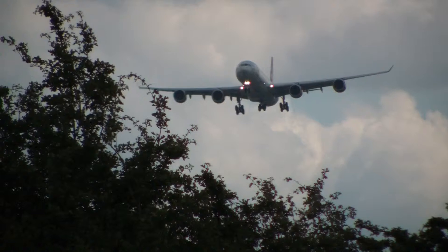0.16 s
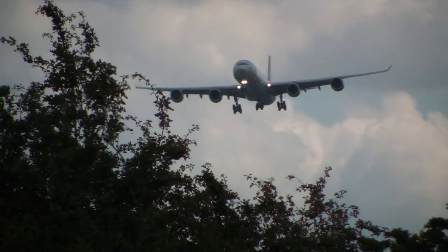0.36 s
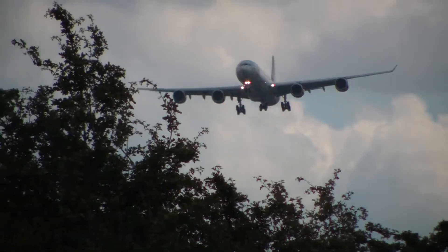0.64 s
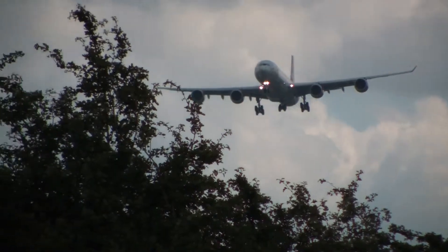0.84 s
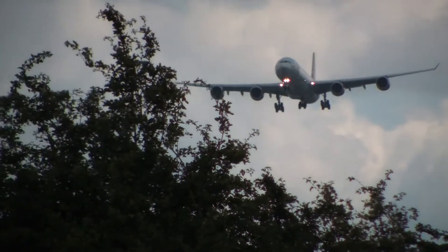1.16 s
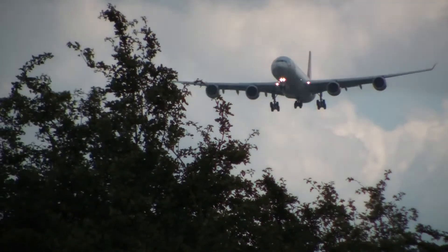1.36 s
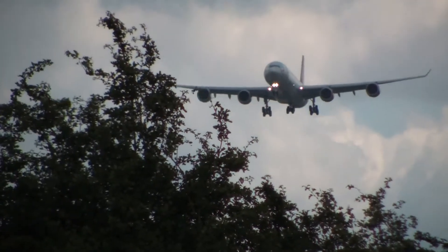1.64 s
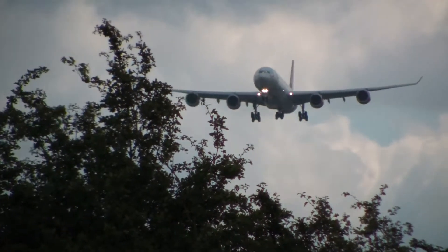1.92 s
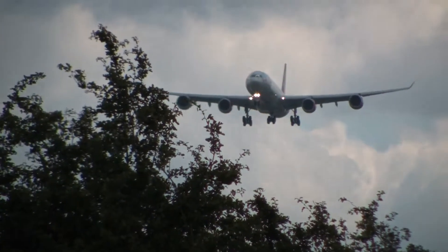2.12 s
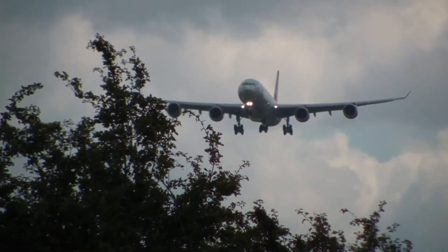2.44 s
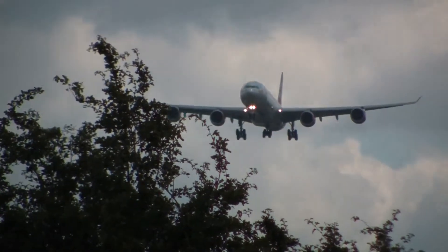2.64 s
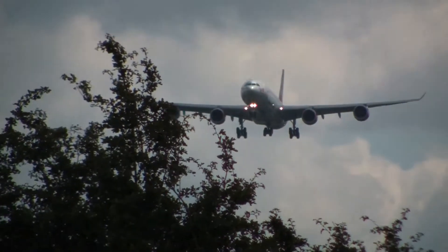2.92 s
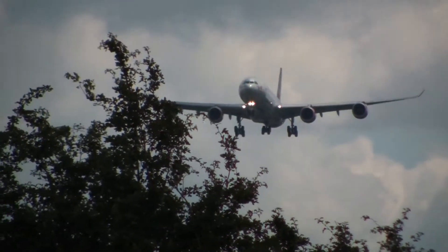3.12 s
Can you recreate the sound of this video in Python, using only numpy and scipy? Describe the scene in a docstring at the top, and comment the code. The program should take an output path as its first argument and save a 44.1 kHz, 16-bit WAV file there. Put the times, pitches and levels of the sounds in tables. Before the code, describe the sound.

A distant four-engine airliner approaches with a broad, uneven roar, deep rumble and faint blurred moan, slowly growing; outdoors in the open, short wind gusts thump and buffet the unprotected stereo microphone, sometimes overloading it.

```python
"""Airliner approach in a breeze

Far off, an airliner on its landing approach gives a low rumble, a deep throb, a blurred moan and a broad roar.
All four are shaped noise; each band of the roar swells and fades, in part dipping after hard gusts as the
recorder's limiter turns the level down. Wind noise with short gusts and single pressure thumps buffets
the microphone, the hardest up to overload."""
import sys
import numpy as np
from scipy import signal
from scipy.fft import rfft, irfft
from scipy.io import wavfile
from scipy.ndimage import uniform_filter1d

SR = 44100
rng = np.random.default_rng(int(sys.argv[2]) if len(sys.argv) > 2 else 0)


def transcribe(signal):
    """Save signal, clipped to [-1, 1], as a 16-bit WAV file at the path in sys.argv[1]."""
    frames = np.atleast_2d(signal).T
    limited = np.clip(frames, -1, 1)
    pcm = np.round(limited * 32767).astype(np.int16)
    wavfile.write(sys.argv[1], SR, pcm)


N = 144648

# Uneven rise and fall of the rumble, without its steady growth; only relative level counts [t/s, level/dB]
RUMBLE_SWELL = [(0.19, -24), (0.47, -25.5), (0.75, -21), (0.79, -26.5), (0.91, -19.5), (0.99, -25.5),
                (1.19, -25), (1.27, -21), (1.51, -26), (1.71, -24.5), (1.79, -26.5), (2.79, -18.5),
                (2.91, -24.5), (3.11, -22), (3.23, -25)]
# Rise and fall of the roar, shared by the fan moan; only the relative level counts [t/s, level/dB]
ROAR_SWELL = [(0.19,-23.5), (0.27,-19.5), (0.44,-25), (0.5,-20), (0.56,-16), (0.7,-19), (0.8,-20.5),
              (1.15,-22.5), (1.23,-26.5), (1.31,-22.5), (1.55,-25), (1.63,-21.5), (1.75,-26.5), (1.83,-22),
              (1.91,-25), (1.97,-19.5), (2.15,-20.5), (2.2,-24.5), (2.42,-22), (2.49,-22), (2.63,-19),
              (2.76,-21), (2.83,-26), (3.07,-22), (3.23,-25.5)]
TONAL_SAME, TONAL_LEFT_DB = 1, 2.5  # rumble, throb and moan: left-right likeness, left minus right


def amp(db):
    """Decibels to gain."""
    return 10 ** (np.asarray(db) / 20)


def unit(x):
    """Scales to rms 1."""
    return x / np.sqrt(np.mean(x ** 2) + 1e-20)


def at_hz(points, hz):
    """Reads a table on a log-frequency axis."""
    f, value = np.transpose(points)
    return np.interp(np.log(hz + 1), np.log(f + 1), value)


def swing(points, t):
    """Reads a level curve, in dB about its mean power."""
    db = np.interp(t, *np.transpose(points))
    return db - 10 * np.log10(np.mean(amp(db) ** 2))


def drift(shape, widths):
    """Smooth random field of rms 1; widths in cells, one for each axis."""
    field = rng.standard_normal(shape)
    for axis, width in enumerate(widths):
        smooth = np.exp(-(np.fft.rfftfreq(shape[axis]) * width * 2) ** 2)
        spectrum = rfft(field.swapaxes(axis, -1)) * smooth
        field = irfft(spectrum, shape[axis]).swapaxes(axis, -1)
    return unit(field)


def noise_pair(gain, same):
    """Left and right noise with one spectrum; the likeness is the share of power in common."""
    common, own_left, own_right = rfft(rng.standard_normal((3, N))) * gain
    same = np.clip(same, 0, 1)
    own = np.array([own_left, own_right])
    return unit(irfft(np.sqrt(same) * common + np.sqrt(1 - same) * own, N))


def steadied(x, span_s):
    """Divides out the slow level of a noise, so that an envelope alone sets its strength."""
    power = uniform_filter1d((x ** 2).mean(0), max(int(span_s * SR), 2))
    return x / np.sqrt(power + 1e-9)


def narrow_noise(centre_hz, width_hz, span_s):
    """Steadied noise in a resonance-shaped hump; the width is taken at half amplitude."""
    hz = np.fft.rfftfreq(N, 1 / SR)
    gain = 1 / (1 + (2 * (hz - centre_hz) / width_hz) ** 2)
    return steadied(noise_pair(gain, TONAL_SAME), span_s)


def panned(x, left_db):
    """Sets the left channel this many dB above the right."""
    return x * amp(np.array([[left_db], [-left_db]]) / 2)


def jet_roar():
    """Exhaust and airframe noise; each band swells and fades, in part dipping as the limiter reacts to gusts."""
    # Average colour of the jet noise; only its shape counts [f/Hz, level per Hz/dB]
    colour = [(100, -6), (185, -1), (250, 0), (310, -2), (450, -9), (600, -5.5), (780, -3), (920, -2.5),
              (1200, -6), (1600, -9.5), (2000, -13.5), (2700, -21), (3700, -25), (5000, -30.5), (6600, -34),
              (8000, -42.5), (10000, -49.5), (13500, -53.5)]
    # Rise and fall of the low middle, upper roar, hiss and treble; relative levels [t/s, level/dB]
    body_swell = [(0.19, -27.0), (0.27, -22), (0.35, -33), (0.55, -26.5), (0.99, -29.5), (1.11, -31.5),
                  (1.19, -27), (1.27, -31.0), (1.43, -28.5), (1.55, -29.5), (1.71, -26.5), (2.07, -29.5),
                  (2.11, -28), (2.31, -32), (2.51, -22), (2.55, -29), (2.67, -26.5), (2.91, -29),
                  (2.99, -25), (3.23, -27)]
    upper_swell = [(0.19,-26), (0.33,-25), (0.4,-28.5), (0.51,-24.5), (0.63,-27.5), (0.8,-27), (0.9,-25.5),
                   (1.35,-24), (1.7,-24), (1.8,-28), (1.9,-29), (2.05,-25.5), (2.43,-26), (2.68,-23.5),
                   (2.83,-26), (3.05,-27), (3.23,-31)]
    hiss_swell = [(0.19, -39), (0.27, -37.5), (0.43, -43.5), (0.55, -39.5), (0.71, -40), (0.79, -41),
                  (1.15, -39.5), (1.23, -43), (1.67, -37), (1.83, -38), (1.87, -41), (2.03, -36),
                  (2.43, -39.5), (2.63, -38), (2.79, -39.5), (2.83, -43), (2.91, -41.5), (3.23, -44)]
    treble_swell = [(0.19, -45.5), (0.31, -42.5), (0.43, -50.5), (0.51, -48.0), (0.79, -49.5), (0.95, -49),
                    (1.07, -51.5), (1.19, -47.5), (1.27, -54.5), (1.31, -50.5), (1.47, -51.5), (1.63, -50),
                    (1.91, -49.5), (2.03, -42), (2.43, -47.5), (2.99, -52.5), (3.03, -50.5), (3.23, -53)]
    # Where the six swells act in turn, then a top band with no swell [f/Hz]
    band_hz = [250, 480, 900, 1700, 3400, 6800, 13000]
    # Stereo likeness: the likeness of left and right amplitudes [f/Hz, likeness/1]
    likeness = [(60, 0.95), (300, 1), (900, 0.98), (1800, 0.89), (3700, 0.73), (5000, 0.66), (6600, 0.44),
                (8000, 0.25), (13000, .15)]
    # Stereo balance [f/Hz, left minus right/dB]
    balance = [(100, 0.8), (900, 1.74), (1800, 2), (3700, 2.5), (6600, 1), (9000, 3.5), (13000, 3.5)]
    # Phase by which the left port leads [f/Hz, lead/rad]
    lead = [(100, 0.12), (900, -0.19), (2700, 0.25), (5000, 0.49), (6600, 1.3), (8000, 3.16),
            (10000, -1.75)]
    roar_db = -17
    # scintillation by the air: patches in time and frequency, and a flutter of all bands at once
    patch_db, patch_s, patch_hz = 1.54, 0.16, 122
    flutter_db, flutter_s = 0.5, 0.027

    window, hop = 1024, 256
    frames, hz = N // hop + 5, np.fft.rfftfreq(window, 1 / SR)
    t = np.arange(frames) * hop / SR
    curves = (RUMBLE_SWELL, body_swell, ROAR_SWELL, upper_swell, hiss_swell, treble_swell)
    levels = np.array([swing(curve, t) for curve in curves] + [np.zeros(frames)])
    # each row of shares crossfades one swell into its neighbours along the spectrum
    shares = np.array([at_hz(list(zip(band_hz, row)), hz) for row in np.eye(len(band_hz))])
    db = at_hz(colour, hz) + levels.T @ shares
    db += patch_db * drift(db.shape, (patch_s / t[1], patch_hz / hz[1]))
    db += flutter_db * drift((frames,), (flutter_s / t[1],))[:, None]

    a, b, c, d = rng.standard_normal((4, frames, len(hz)))
    same = np.clip(at_hz(likeness, hz), -1, 1)
    side = amp(at_hz(balance, hz) / 2)
    left = a + 1j * b
    right = same * left + np.sqrt(1 - same ** 2) * (c + 1j * d)
    right = right * np.exp(-1j * at_hz(lead, hz))
    spectra = np.array([left * side, right / side]) * amp(db)
    roar = signal.istft(spectra.swapaxes(1, 2), nperseg=window, noverlap=window - hop)[1]
    return amp(roar_db) * unit(roar[:, :N])


def jet_rumble():
    """Deep humps of exhaust noise that grow, and sink in pitch, as the aircraft climbs in the view."""
    # Humps in the rumble, before swell and growth [start f/Hz, end f/Hz, width/Hz, level/dB]
    humps = [(137.7, 134, 23, -28), (318, 238, 58, -31), (539.6, 405, 38, -38)]
    growth_db_per_s = 2.4
    t, out = np.arange(N) / SR, np.zeros((2, N))
    for start_hz, end_hz, width_hz, db in humps:
        hump = narrow_noise(start_hz, width_hz, 0.12)
        shift_hz = np.linspace(0, end_hz - start_hz, N)
        glide = np.exp(2j * np.pi * np.cumsum(shift_hz) / SR)
        out += amp(db) * (signal.hilbert(hump) * glide).real  # slides the whole hump in frequency
    growth_db = growth_db_per_s * (t - t.mean())
    return panned(out * amp(swing(RUMBLE_SWELL, t) + growth_db), TONAL_LEFT_DB)


def throb():
    """A narrow, very deep noise band, nearly a pure note, that stands out near the end."""
    # Level of the throb [t/s, level/dB]
    throb_level = [(.2, -29), (2.55, -28), (2.78, -21.5), (2.88, -14), (3.0, -18), (3.12, -24), (3.25, -30)]
    note = narrow_noise(63.8, 18, 0.064)
    t = np.arange(N) / SR
    return panned(note * amp(np.interp(t, *np.transpose(throb_level))), TONAL_LEFT_DB)


def fan_moan():
    """A blurred band of fan noise that swells with the roar and grows as the engines near."""
    moan_db, growth_db_per_s = -33.5, 2.5
    tone = narrow_noise(943, 170, 0.12)
    t = np.arange(N) / SR
    level_db = moan_db + swing(ROAR_SWELL, t) + growth_db_per_s * (t - t.mean())
    return panned(tone * amp(level_db), TONAL_LEFT_DB)


def wind():
    """Eddies press on the two ports, a steady breeze and short gusts; small eddies are less alike at both."""
    # Gusts on the microphone, as bell curves of power [t/s, half length/s, level/dB]
    gusts = [(0.238, 0.015, -21), (0.327, 0.035, -8), (0.376, 0.03, -7), (0.748, 0.045, -7.5),
             (1.038, 0.051, -10), (1.213, 0.04, -7.5), (1.47, 0.088, -13.5), (1.725, 0.039, -9.5),
             (1.82, 0.038, -10), (2.824, 0.023, -8), (3.152, 0.12, -16), (3.263, 0.03, -2)]
    # Colour of the wind pressure on the ports; only its shape counts [f/Hz, level per Hz/dB]
    pressure = [(6, -13), (13, 5), (22, 1), (35, -2), (50, -5), (70, -5.5), (100, -15), (200, -21),
                (400, -35), (1200, -54), (4000, -103)]
    # Stereo likeness of the wind: the share of power in common [f/Hz, likeness/1]
    likeness = [(20, 0.76), (50, 0.63), (110, 0.49), (250, 0.3)]
    breeze_db, left_db = -18, 0.5
    hz, t = np.fft.rfftfreq(N, 1 / SR), np.arange(N) / SR
    power = amp(breeze_db) ** 2
    for centre_s, half_s, db in gusts:
        power = power + amp(db) ** 2 * np.exp(-((t - centre_s) / half_s) ** 2)
    eddies = steadied(noise_pair(amp(at_hz(pressure, hz)), at_hz(likeness, hz)), 0.05)
    return panned(np.sqrt(power) * eddies, left_db)


def thumps():
    """Each eddy gives a brief push or suction with a slower rebound, and reaches the two ports slightly apart."""
    # Single eddies on the microphone [t/s, half width/ms, peak level/dB, left minus right/dB]
    hits = [(.245, 2, -5.5, -4), (.288, 4.7, -7, 5), (0.361, 2.7, -3, 2), (.394, 2.4, 2, 1),
            (0.417, 3.4, -10.5, 22), (.724, 4.1, -2.5, 0), (0.75, 3.2, -0.5, -10), (.962, 2.7, -3, 11.5),
            (1.018, 2.1, -6, 3), (1.094, 5, -11.5, 17), (1.186, 1.64, -3.5, 5), (1.2, 3.2, -0.5, 3.5),
            (1.369, 3, -5.5, 7), (1.501, 1.6, -9, 2), (1.756, 2.4, -4.5, 4), (1.851, 6.6, -4.5, -6),
            (2.196, 3.6, -8, 5), (2.677, 4.7, -7, 2), (2.797, 2.1, -2, 3.5), (3.117, 4.3, -2.5, 1),
            (3.153, 3.4, -7, -2), (3.236, 2.5, -4, -5), (3.258, 4.8, 2.5, 5)]
    rebound = 3  # times wider than the push
    port_lag_ms = 1.34  # largest shift of arrival, opposite at the two ports
    t, out = np.arange(N) / SR, np.zeros((2, N))
    draws = rng.uniform(-0.86, 1, (len(hits), 2))
    for (centre_s, width_ms, db, left_db), (way, lag) in zip(hits, draws):
        ms = 1000 * (t - centre_s) + lag * port_lag_ms * np.array([[1], [-1]])
        u = ms / width_ms
        push = np.exp(-u ** 2) - np.exp(-(u / rebound) ** 2) / rebound
        out += panned(np.sign(way) * amp(db) * push / push.max(), left_db)  # sign: push or suction
    return out


def scene():
    """Aircraft and wind together."""
    return jet_roar() + jet_rumble() + throb() + fan_moan() + wind() + thumps()


def record(dry):
    """The sound cuts in; hard gusts push a limiter down and round off at the ceiling; then the band limit."""
    start_s, open_s = 0.165, 0.0074
    limit, release_db_per_s, attack_s = 1.38, 25, 0.03  # limit as a share of full scale
    ceiling, knee, edge_hz = 1.0, 0.8, 14600
    t = np.arange(N) / SR
    x = dry * np.clip((t - start_s) / open_s, 0, 1)

    over_db = 20 * np.log10(np.maximum(abs(x).max(0) / limit, 1))
    fall_db = release_db_per_s * t
    held_db = np.maximum.accumulate(over_db + fall_db) - fall_db  # peak hold that falls at a steady rate
    lag = np.exp(-1 / (attack_s * SR))
    x = x / amp(signal.lfilter([1 - lag], [1, -lag], held_db))

    room = ceiling - knee
    rounded = room * np.tanh(np.maximum(abs(x) - knee, 0) / room)
    x = np.sign(x) * (np.minimum(abs(x), knee) + rounded)
    low_pass = signal.firwin(511, edge_hz, window=("kaiser", 9), fs=SR)
    return signal.oaconvolve(x, low_pass[None], "same")


dry = scene()
out = record(dry)
transcribe(out)
```